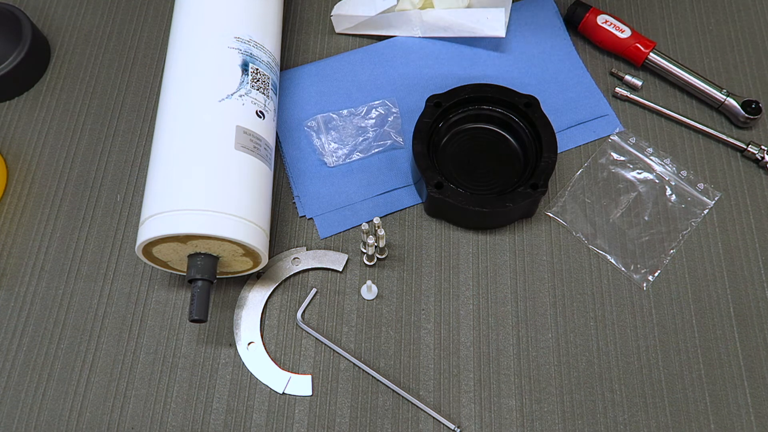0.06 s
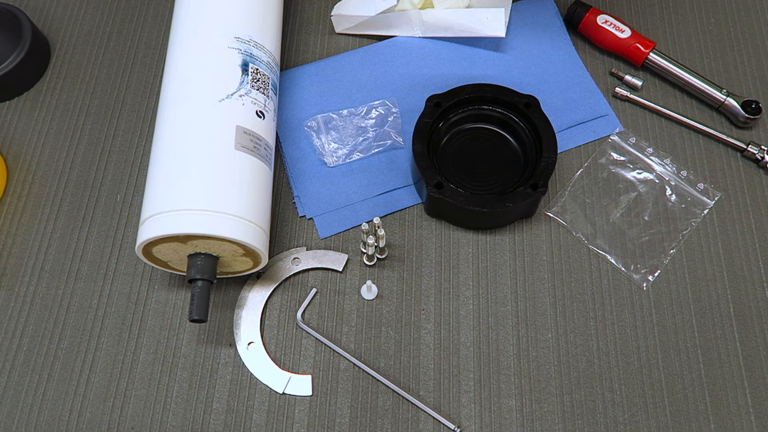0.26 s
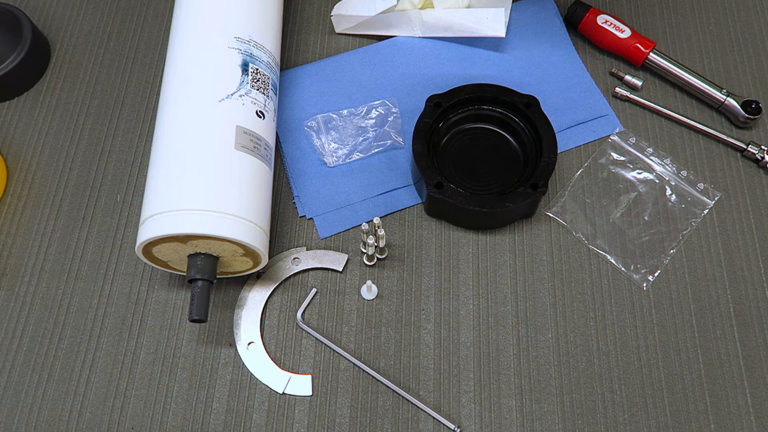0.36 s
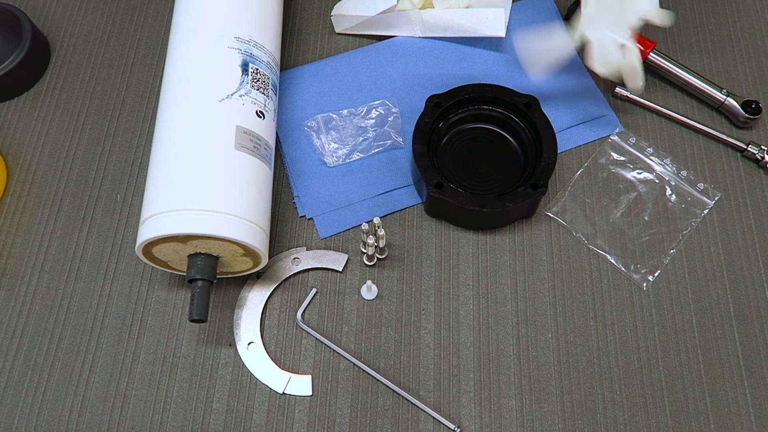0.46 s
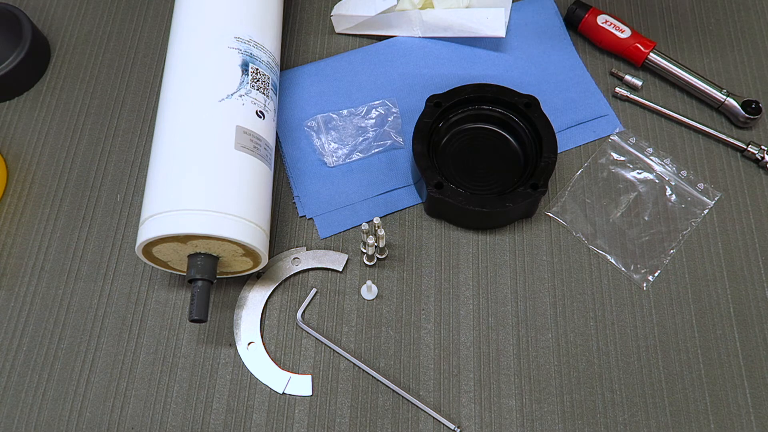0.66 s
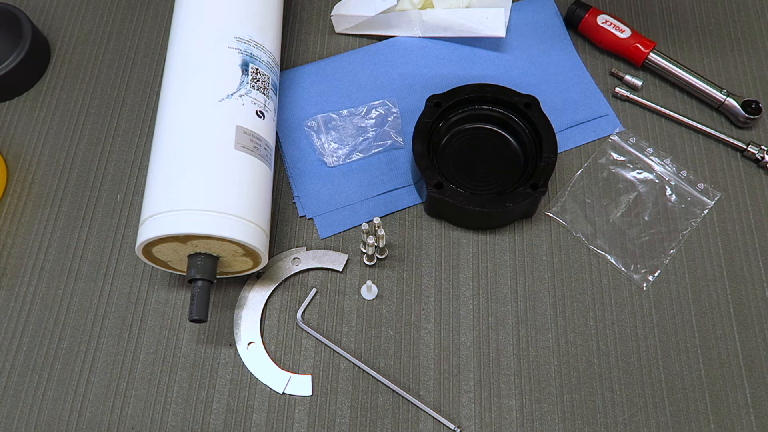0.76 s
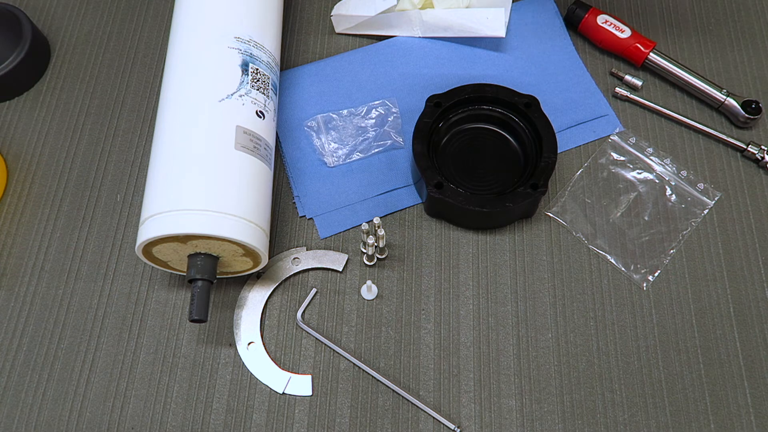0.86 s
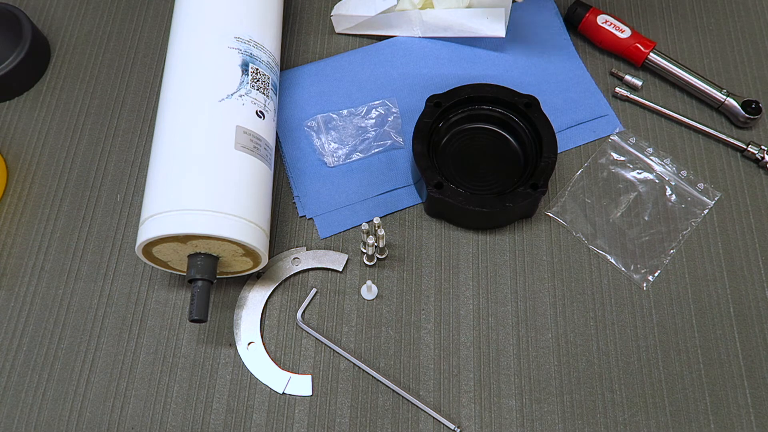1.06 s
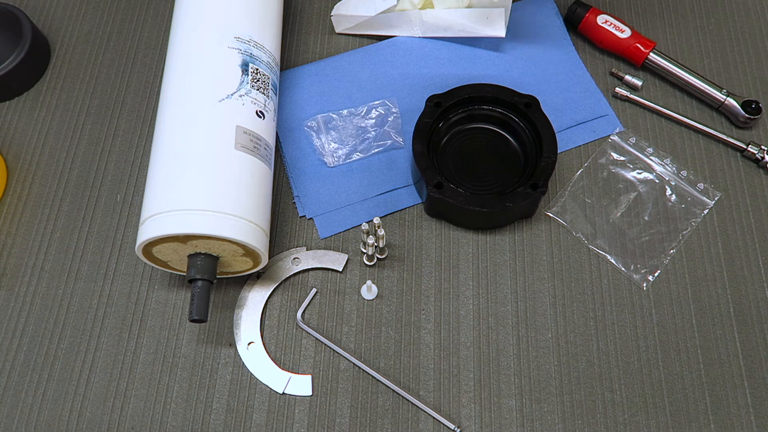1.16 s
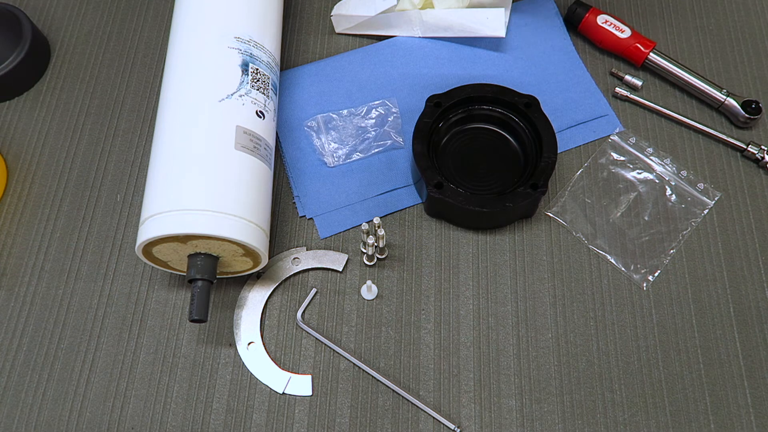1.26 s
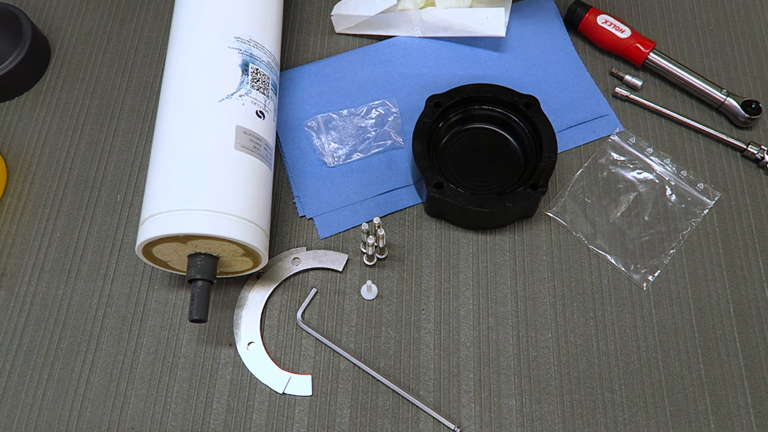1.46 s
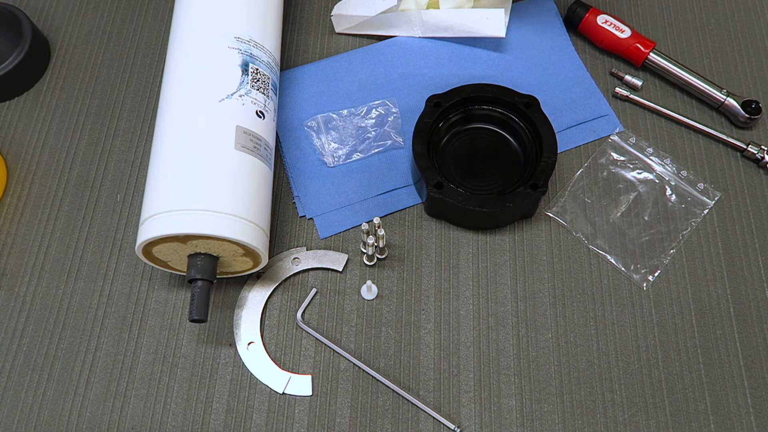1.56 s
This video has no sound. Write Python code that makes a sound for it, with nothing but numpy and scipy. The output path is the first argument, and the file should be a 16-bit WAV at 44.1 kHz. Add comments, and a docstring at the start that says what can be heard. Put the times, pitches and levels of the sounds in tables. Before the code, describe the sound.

Thin rubber gloves are peeled off close to the microphone in a hard-walled room. Light crinkles and ticks from 0 s lead to a loud, bright snap at 0.25 s; a small tick at 0.39 s precedes a second, rougher snap around 0.48-0.51 s. Echo and low thumps fade into soft hush and a barely audible whine. Faint ticks come at 1.0 and 1.2 s, a small rustle around 1.5 s.

```python
"""Rubber gloves peeled off

Close to a camera's microphone, over a work table, thin rubber gloves crinkle, drag, tick and snap free twice;
a last small rustle follows. Tiny random slips through film resonances make the drag, dying cycles and noise
cracks the ticks and snaps. Decaying noise makes the hard-walled room ring; low thumps, a room mode, a wide
hush and a faint whine lie around them. Gain control turns the level down after loud moments."""
import sys
import numpy as np
from scipy import signal
from scipy.fft import rfft, irfft, next_fast_len
from scipy.io import wavfile

SR = 44100
rng = np.random.default_rng(int(sys.argv[2]) if len(sys.argv) > 2 else 0)


def persist_wave(psi):
    """Save psi, clipped to +-1, as 16-bit WAV."""
    counts = np.round(np.clip(psi, -1, 1) * 32767).astype(np.int16)
    wavfile.write(sys.argv[1], SR, np.atleast_2d(counts).T)


N = 70560  # samples

# Resonances of the rubber film: (centre [Hz], width [Hz], level [dB])
FILM_MID = [(1483, 600, -0.5), (2425, 1445, -0.5), (3156, 830, 1), (4430, 1100, -6.5)]
FILM_TREBLE = [(6410, 3020, 0.5), (9800, 4600, -3), (13000, 3900, -4)]
FILM_BASS = [(222, 80, -7), (350, 52, 2), (484, 200, -4), (851, 260, -5.5)]
# Drag of rubber over skin, one table a movement:
# (time [s], level [dB], treble over level [dB], bass over level [dB])
CRINKLE = [(0, -44, -15.5, -1.5), (.03, -49, -12, -3.5), (.06, -48.5, -10.5, -0.5), (.13, -53.5, -7, 3.5),
           (.17, -47.5, -7, 3.5), (.2, -46.5, -6.5, 4.5)]
FIRST_PULL = [(.2, -36.5, -3.5, -9.5), (.209, -36.5, -13, -11), (0.21, -32.5, -6.5, -8),
              (.228, -31, -4.5, -3), (0.238, -32, 1.5, -6.5), (0.241, -19.5, -0.5, -7.5),
              (0.249, -9.5, -2.5, -7), (.255, -17.5, -6, -8.5), (0.271, -34.5, -8.5, -10),
              (0.299, -48.5, -23, 5)]
SECOND_PULL = [(.44, -51.5, -1, -0.5), (0.455, -36.5, -10, 1.5), (0.458, -29.5, 1.5, -5),
               (0.473, -24, -5, -10.5), (0.481, -14.5, -14, -19), (0.484, -27.5, -4.5, -5.5),
               (.498, -31, -6.5, -17), (0.5, -18, -1.5, -5.5), (0.508, -15.5, -15, -6.5),
               (0.519, -29, -8.5, -12), (0.549, -35.5, -10.5, 1)]
SHUFFLE = [(1.05, -77, -16.5, 7.9), (1.15, -67.5, -8.5, 12.4), (1.3, -67.5, -19, 4.4),
           (1.46, -66, -21, 6.7)]
LAST_RUSTLE = [(1.46, -68.5, -20, 7.5), (1.48, -59, -5, 4), (1.5, -70, -3, 0.5), (1.518, -56, -6, 6.5),
               (1.525, -47.5, -8, -19), (1.545, -48.5, -8.5, 1.5), (1.558, -52.5, -17, 8),
               (1.59, -60, -5, -9), (1.6, -47, -4, -6)]
# Single ticks and snaps of the film: (time [s], level [dB], pitch [Hz])
TICKS = [(.004, -29, 3980), (0.04, -42.5, 12200), (.047, -36, 10240), (0.05, -28.5, 4300),
         (.0915, -45, 11600), (0.098, -41, 4930), (.109, -25, 4000), (0.1213, -21.5, 12400),
         (.1217, -27, 5140), (.13, -45.5, 11000), (.157, -29, 5000), (.1575, -29.5, 12000),
         (.188, -26, 10000), (0.2063, -22.5, 7200), (0.2224, -18.5, 4250), (0.2396, -5.5, 3300),
         (.2448, 0, 3230), (.245, -21, 368), (.246, -25, 530), (.2465, 1, 3540), (.2475, -3.5, 2500),
         (.386, -17, 2195), (.3865, -27, 3540), (0.46, -19.5, 11300), (0.471, -21.5, 11000),
         (0.4782, -9.5, 2500), (.481, -4, 2670), (0.4842, -9.5, 2950), (0.499, -11.5, 1995),
         (.503, -25, 494), (0.5049, -13, 894), (0.511, -10, 1260), (1.005, -37.5, 11000),
         (1.221, -45.5, 7000), (1.48, -45.5, 3000), (1.523, -41, 6460), (1.548, -35.5, 860),
         (1.56, -55, 460)]
# Width of the direct sound: (frequency [Hz], side over mid [dB])
NEAR_SIDE = [(60, -5.5), (130, -9), (290, -11.5), (640, -15.5), (1410, -34), (3100, -42), (6820, -18),
             (15000, -10)]
# Time the ringing room takes to fall 60 dB: (frequency [Hz], time [s])
ROOM_T60 = [(80, 0.26), (210, 0.82), (560, 0.72), (1470, 0.74), (3880, 0.79), (10200, 0.37)]
# Strength of the ringing room: (frequency [Hz], level over the direct sound [dB])
ROOM_COLOUR = [(60, -8.5), (115, -12.5), (250, -2.5), (700, -3.5), (2000, -5.5), (5000, -12.5),
               (10000, -10.5), (15000, -23.5)]
# Width of the ringing room: (frequency [Hz], side over mid [dB])
ROOM_SIDE = [(60, -4), (130, -17), (290, -11), (640, -21), (1410, -17.5), (3100, -12.5), (6820, -3),
             (15000, 5)]
# The pulls set off the low room mode: (time [s], level [dB])
BOOMS = [(0.204, -39), (0.507, -37.5)]
# Soft bumps through the table: (time [s], level [dB], pitch [Hz])
THUMPS = [(0.269, -38, 62.6), (0.496, -36, 70), (1.31, -47, 34.9)]
# Spectrum shape of the room's hush: (frequency [Hz], relative density [dB per Hz])
HUSH_SHAPE = [(12, -36), (20, -6), (45, -6), (86, -12.5), (168, -6), (248, -13), (422, -11.5), (738, -20),
              (976, -15), (3160, -24), (12100, -43.5), (16000, -50)]
# Width of the hush: (frequency [Hz], side over mid [dB])
HUSH_SIDE = [(60, -10.5), (130, -2.5), (290, 9.5), (640, 5.5), (1410, -1), (3100, -2.5), (6820, 0),
             (15000, 4)]
# Response of the microphone: (frequency [Hz], gain [dB])
MIC = [(10000, 0.5), (13000, 0.5), (15000, -6.5), (16000, -12.5)]

SLIPS_PER_S, SLIP_SPREAD_DB = 8000, 2.5
SMOOTH_SHARE = 0.29  # share of the drag's power that is even noise
FILM_LOW_HZ = 85  # the film radiates little under this
TICK_CYCLES = 12.8  # cycles for a tick's ring to fall 60 dB
TICK_RISE_S = 0.00018
TICK_CRACK_DB, CRACK_T60_S = -2.5, 0.0059  # crack against ring, and its decay
CRACK_WIDTH = 0.87  # as a fraction of the pitch
ROOM_GAP_S = .006  # delay before the room answers
TAILS, TURN_S = 6, .002  # different noise tails, and the time between their turns
BOOM_HZ, BOOM_T60_S, BOOM_RISE_S = 114.45, .9, 0.0027
HUM_WIDTH_HZ, HUM_DB = 13, -62.5
HUSH_DB = -54.5
WHINE_HZ, WHINE_WIDTH_HZ, WHINE_DB = 8100, 150, -79  # electrical
DUCK_ABOVE_DB, DUCK_RATIO = -40, 0.21  # threshold, and dB turned down per dB over it
DUCK_RECOVER_S = 0.64  # time constant of the averaged power
CEILING, KNEE = 1.0, 10  # full scale, and how sharply peaks round off under it
TOP_HZ = 15900


def amp(db):
    """Decibels to gain."""
    return 10 ** (np.asarray(db) / 20)


def unit(x):
    """Scaled to rms 1."""
    return x / np.sqrt(np.mean(x ** 2) + 1e-20)


def along(points, hz):
    """Interpolate (frequency, value) points on a log frequency axis."""
    f, value = np.transpose(points)
    return np.interp(np.log(hz + 1), np.log(f + 1), value)


def filtered(x, response):
    """Multiply the spectrum of x by a function of frequency."""
    m = next_fast_len(N + SR // 2)
    spectrum = rfft(x, m) * response(np.fft.rfftfreq(m, 1 / SR))
    return irfft(spectrum, m)[..., :N]


def resonances(table):
    """Causal sum of resonances with alternating sign, as a function of frequency."""
    def response(f):
        total = 0
        for k, (centre, width, db) in enumerate(table):
            peak = 1j * f * width / (centre * centre - f * f + 1j * f * width)
            total = total + (-1) ** k * amp(db) * peak
        return total
    return response


def mid_side_gains(colour, side_over_mid):
    """Gains of the mid and side signals, as a function of frequency."""
    return lambda f: amp(along(colour, f) + [0 * f, along(side_over_mid, f)])


def left_right(mid, side):
    """Mid and side to two channels."""
    return np.array([mid + side, mid - side])


def drag():
    """Dense tiny slips of uneven size excite the film's bass, middle and treble resonances."""
    t = np.arange(N) / SR
    happens = rng.random(N) < SLIPS_PER_S / SR
    size = amp(SLIP_SPREAD_DB * rng.exponential(size=N))
    slips = happens * size * np.sign(rng.standard_normal(N))
    smooth = rng.standard_normal(N)
    friction = np.sqrt(1 - SMOOTH_SHARE) * unit(slips) + np.sqrt(SMOOTH_SHARE) * smooth
    level, treble, bass = np.zeros((3, N))
    for rows in (CRINKLE, FIRST_PULL, SECOND_PULL, SHUFFLE, LAST_RUSTLE):
        s, db, treble_db, bass_db = np.transpose(rows)
        inside = (t >= s[0]) & (t < s[-1])
        level += inside * amp(np.interp(t, s, db))
        treble += inside * amp(np.interp(t, s, db + treble_db))
        bass += inside * amp(np.interp(t, s, db + bass_db))
    out = np.zeros(N)
    for gain, film in [(level, FILM_MID), (treble, FILM_TREBLE), (bass, FILM_BASS)]:
        steady = filtered(friction, resonances(film))
        out += filtered(friction * gain, resonances(film)) / np.std(steady)
    return out


def ticks():
    """Each tick or snap is a few dying cycles at its pitch plus a crack of noise spread around that pitch."""
    out = np.zeros(N + SR)
    t = np.arange(SR // 20) / SR
    f = np.fft.rfftfreq(len(t), 1 / SR)
    noises = rng.standard_normal((len(TICKS), len(t)))
    rise = 1 - np.exp(-t / TICK_RISE_S)
    for (s, db, hz), noise in zip(TICKS, noises):
        ring = amp(-60 * t * hz / TICK_CYCLES) * np.sin(2 * np.pi * hz * t)
        band = resonances([(hz, CRACK_WIDTH * hz, 0)])(f) ** 2
        crack = unit(irfft(rfft(noise) * band, len(t)))
        crack_fade = amp(TICK_CRACK_DB - 60 * t / CRACK_T60_S)
        start = round(s * SR)
        out[start:start + len(t)] += amp(db) * rise * (ring + crack_fade * crack)
    return out[:N]


def room(x):
    """The walls answer with noise dying at its own speed in each band, after a short gap."""
    hz, t, z = signal.stft(rng.standard_normal((TAILS, 2, SR)), SR, nperseg=256)
    decay = amp(-60 * t / along(ROOM_T60, hz)[:, None])
    even_decay = decay / np.linalg.norm(decay, axis=1)[:, None]  # equal energy in each band
    tails = signal.istft(z * even_decay, SR, nperseg=256)[1]
    tails = tails / np.linalg.norm(tails[0, 0])
    # short moments take turns through the tails, which keeps the ring evenly coloured
    turn = (np.arange(N) / SR / TURN_S - np.arange(TAILS)[:, None]) % TAILS
    moments = x * np.sqrt(np.maximum(1 - np.abs(turn - 1), 0))
    late = np.pad(moments, ((0, 0), (round(ROOM_GAP_S * SR), 0)))[:, None]
    wet = signal.fftconvolve(late, tails, axes=2)[..., :N].sum(axis=0)
    mid, side = filtered(wet, mid_side_gains(ROOM_COLOUR, ROOM_SIDE))
    return left_right(mid, side)


def thump():
    """Each soft bump through the table is about one slow cycle under a bell-shaped swell."""
    out = np.zeros(N)
    for s, db, hz in THUMPS:
        cycles = (np.arange(N) / SR - s) * hz
        out += amp(db) * np.sin(2 * np.pi * cycles) * np.exp(-(2 * cycles) ** 2)
    return out


def boom():
    """The low room mode: a narrow steady hum of filtered noise plus a dying ring from each pull."""
    hum = unit(filtered(rng.standard_normal(N), resonances([(BOOM_HZ, HUM_WIDTH_HZ, 0)])))
    out = amp(HUM_DB) * hum
    for s, db in BOOMS:
        t = np.maximum(np.arange(N) / SR - s, 0)
        swell = 1 - np.exp(-t / BOOM_RISE_S)
        out = out + amp(db - 60 * t / BOOM_T60_S) * swell * np.sin(2 * np.pi * BOOM_HZ * t)
    return out


def hush():
    """The room's steady, wide background of shaped noise, and a thin whine of narrow noise in the centre."""
    mid, side = filtered(rng.standard_normal((2, N)), mid_side_gains(HUSH_SHAPE, HUSH_SIDE))
    whine = unit(filtered(rng.standard_normal(N), resonances([(WHINE_HZ, WHINE_WIDTH_HZ, 0)])))
    return amp(HUSH_DB) * left_right(mid, side) / np.std(mid) + amp(WHINE_DB) * whine


def scene():
    """Gloves near the camera, the room around them, and the background."""
    gloves = filtered(drag() + ticks(), lambda f: (1j * f / (FILM_LOW_HZ + 1j * f)) ** 2)
    # the side signal is a quarter cycle away from the mid
    side = filtered(gloves, lambda f: amp(along(NEAR_SIDE, f)) * 1j)
    near = left_right(gloves, side)
    return near + room(gloves) + boom() + thump() + hush()


def record(dry):
    """Slowly averaged power turns the camera's microphone down; peaks round off and the top is cut."""
    keep = np.exp(-1 / (DUCK_RECOVER_S * SR))
    power = signal.lfilter([1 - keep], [1, -keep], np.mean(dry ** 2, axis=0))
    over_db = np.maximum(10 * np.log10(power + 1e-12) - DUCK_ABOVE_DB, 0)
    heard = filtered(dry, lambda hz: amp(along(MIC, hz)))
    ducked = heard * amp(-DUCK_RATIO * over_db)
    rounded = ducked / (1 + np.abs(ducked / CEILING) ** KNEE) ** (1 / KNEE)
    return filtered(rounded, lambda hz: hz < TOP_HZ)


dry = scene()
out = record(dry)
persist_wave(out)
```